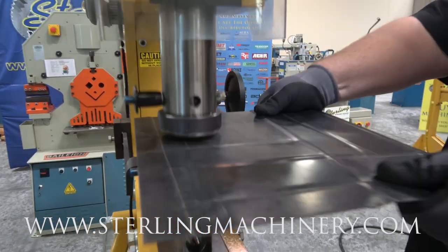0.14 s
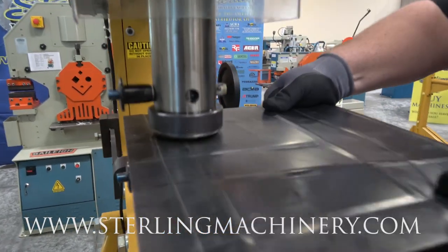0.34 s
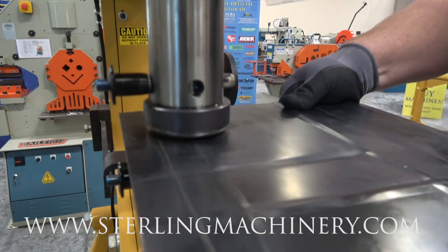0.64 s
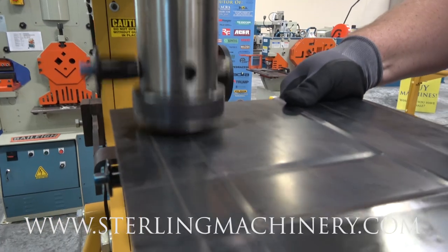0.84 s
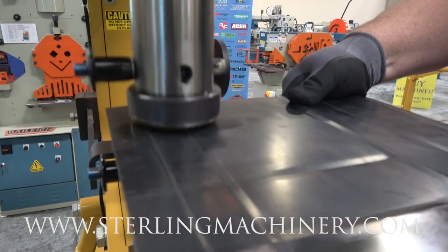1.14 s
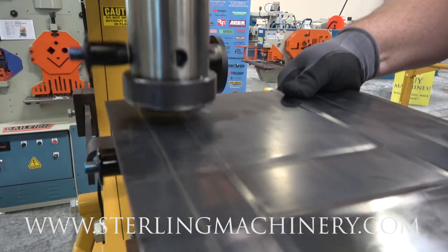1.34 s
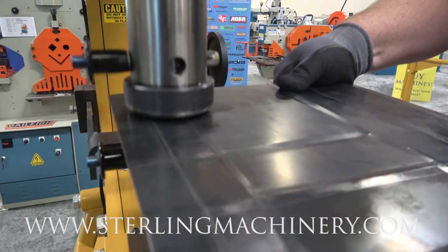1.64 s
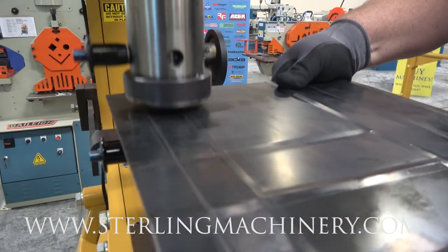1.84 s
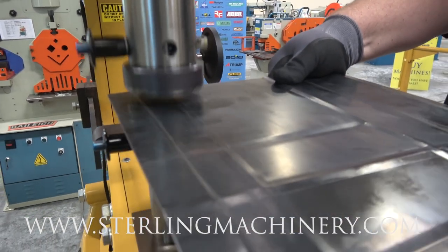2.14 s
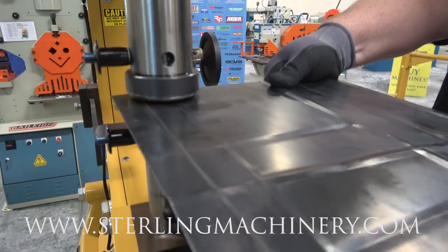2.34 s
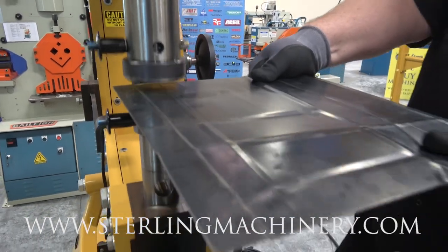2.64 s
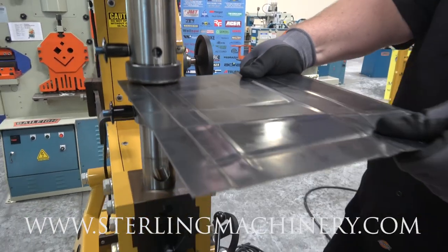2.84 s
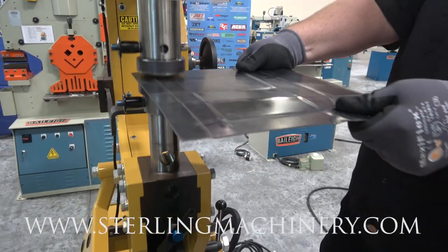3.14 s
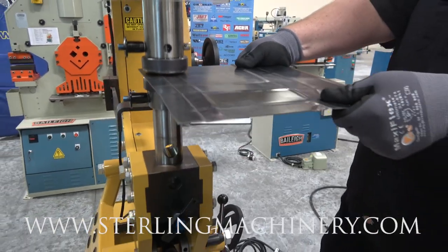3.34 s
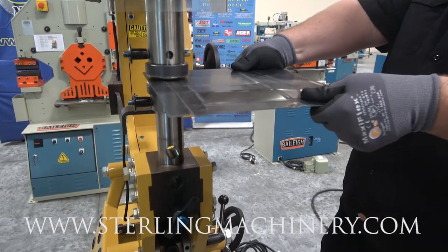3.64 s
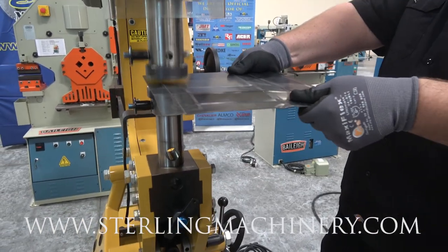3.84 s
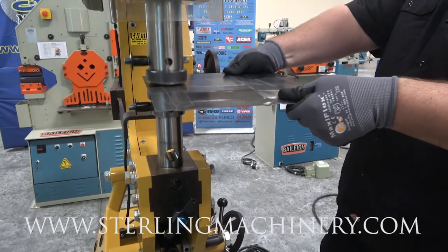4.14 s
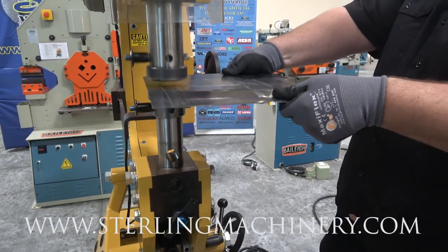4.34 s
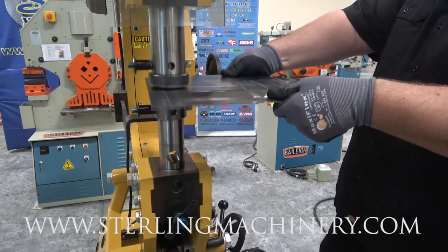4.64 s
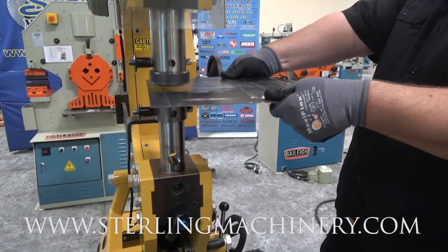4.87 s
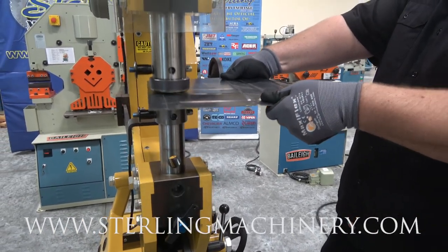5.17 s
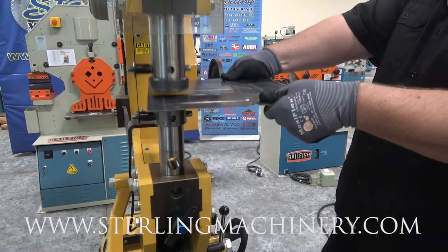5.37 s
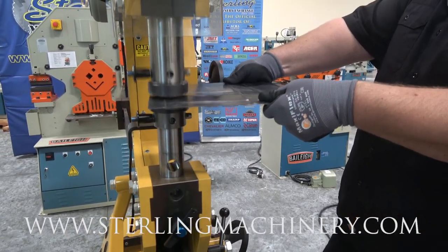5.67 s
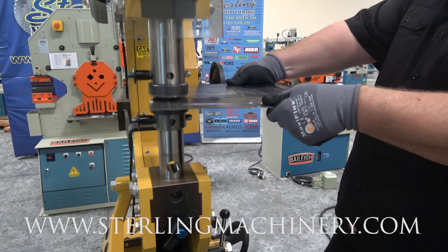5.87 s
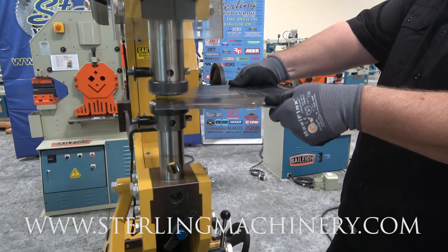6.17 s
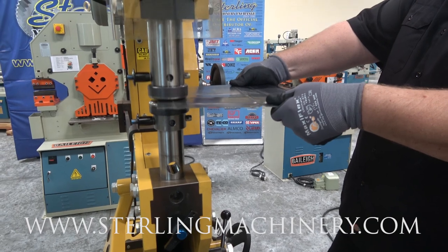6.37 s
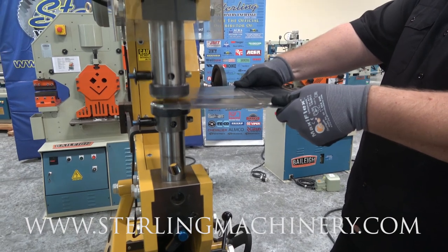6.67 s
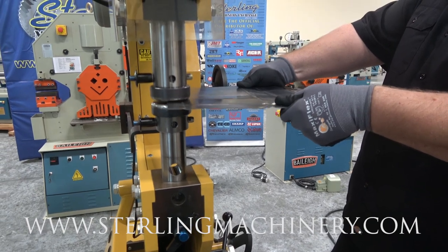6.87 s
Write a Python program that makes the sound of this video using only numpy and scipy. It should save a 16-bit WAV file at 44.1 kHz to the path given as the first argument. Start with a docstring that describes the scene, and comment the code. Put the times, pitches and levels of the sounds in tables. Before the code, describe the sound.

A power hammer pounds hand-held sheet steel at nearly eight sharp, clanking blows a second, with metallic rattles and motor hum in a hard-walled shop.

```python
"""Motor noise fills a hard-walled shop, where a running power hammer beats a hand-held steel sheet.
Each blow cracks the dies, clanks the sheet, thuds in the frame and pushes out air; echoes and rattles follow.
The camera, close at first, is bumped near 0.5 s and 2.2 s while it drifts away and lower.
Near 5 s the sheet trembles longer after its blows. Clicks strike resonances; shaped noise makes the rough parts."""
import sys
import numpy as np
from scipy import signal
from scipy.fft import rfft, irfft
from scipy.io import wavfile

SR = 44100
rng = np.random.default_rng(int(sys.argv[2]) if len(sys.argv) > 2 else 0)


def transcribe(signal):
    """Save signal, clipped to [-1, 1], as a 16-bit WAV file at the path in sys.argv[1]."""
    frames = np.atleast_2d(signal).T
    limited = np.clip(frames, -1, 1)
    pcm = np.round(limited * 32767).astype(np.int16)
    wavfile.write(sys.argv[1], SR, pcm)


def level_to_linear(level):
    """Convert decibel levels to linear amplitude factors, elementwise."""
    exponent = np.asarray(level, float) / 20
    return 10 ** exponent


N = 309141
TIME_S = np.arange(N) / SR

# how the sheet is gripped:
# (time [s], tilt of the clank [dB per octave], relative level of the sheet's own modes [dB])
GRIP_CURVE = [(0, -8, -2.5), (1, 3, 0), (2.4, 0, 1), (3.5, 1, 0), (4.6, -1, 1), (4.85, -1, -4.5),
              (5.7, -1.5, -3.5), (6.1, -1, -1.5), (7, -4, 0.5)]


def band(x, hz, width_hz):
    """Two-pole resonance, gain 1 at the centre."""
    return signal.lfilter(*signal.iirpeak(hz, hz / width_hz, SR), x)


def ring(x, hz, t60):
    """A mode struck by x: a sine that loses 60 dB in t60 seconds."""
    pole = np.exp(2j * np.pi * hz / SR - np.log(1000) / (t60 * SR))
    return signal.lfilter([1], [1, -pole], x).imag


def clicks(s, db):
    """Single-sample clicks at the given times and levels."""
    samples = (np.asarray(s) * SR).astype(int)
    return np.bincount(samples, level_to_linear(np.asarray(db)), 2 * N)[:N]


def fade(x, rise_s, t60):
    """Smooths each click into an envelope with a rise and a decay."""
    fall = np.exp(-np.log(1000) / (t60 * SR))
    rise = np.exp(-1 / (rise_s * SR))
    falling = signal.lfilter([1], [1, -fall], x)
    return signal.lfilter([1 - rise], [1, -rise], falling)


def coloured(spectrum):
    """Noise of rms 1, its spectrum shaped by points of (Hz, dB)."""
    hz, db = np.transpose(spectrum)
    log_hz = np.log(np.arange(1, N // 2 + 2) * SR / N)
    gain = level_to_linear(np.interp(log_hz, np.log(hz), db))
    x = irfft(rfft(rng.standard_normal(N)) * gain, N)
    return x / x.std()


def along(table, s):
    """The columns of a curve, read at times s."""
    at, *cols = np.transpose(table)
    return [np.interp(s, at, col) for col in cols]


def motor_noise():
    """The motor and the shop make a steady noise with a fixed spectrum."""
    # motor and shop noise: (frequency [Hz], relative density [dB per Hz])
    spectrum = [(20, -27), (40, -8), (110, -39), (180, -3), (250, -3.5), (320, 9), (450, -10.5), (700, -15),
                (2000, -33), (5000, -41), (9000, -46), (16000, -42)]
    return level_to_linear(-45.5) * coloured(spectrum)


def chatter(blow_s, blow_db, slaps):
    """Every contact is a sharp knock, then a few ms of rough chatter and a weaker shimmer."""
    upstroke_s, upstroke_db = 0.09, -37.5  # after the blow, relative to it
    blows = clicks(blow_s, blow_db)
    rough = fade(blows, 0.0001, 0.022) + level_to_linear(-13.5) * fade(blows, 0.0016, 0.094)
    rough = rough + fade(slaps, 0.00042, 0.016) + level_to_linear(-16.5) * fade(slaps, 0.00017, 0.024)
    # the linkage clicks as the ram turns at the top
    upstroke = clicks(blow_s + upstroke_s, blow_db + upstroke_db)
    rough = rough + fade(upstroke, 0.0022, 0.092)
    return rough * rng.standard_normal(N) + level_to_linear(13) * blows + slaps


def dies(blow_s, crack_db, clank_db, slaps):
    """The small dies ring high (crack), the clamped sheet lower (clank); both are struck by each contact."""
    # modes of dies and sheet: (frequency [Hz], width [Hz], relative level [dB])
    steel = [(3053, 280, -14.5), (3420, 260, -13.5), (3697, 190, -12), (4220, 1100, -23), (4810, 360, -11),
             (5004, 810, -16.5), (6327, 436, -8), (6900, 110, -5.5), (7352, 354, -2), (7673, 480, -0.5),
             (8680, 750, -1), (9104, 380, -0.5), (9600, 290, -2), (10200, 880, -6), (11096, 590, -12),
             (12040, 510, -12.5), (13500, 3000, -20.5), (14350, 730, -39)]
    die_low_hz, clank_mid_hz = 5600, 3700
    grip_scatter_db = 3  # per octave, random from blow to blow
    crack = chatter(blow_s, crack_db, level_to_linear(3.5) * slaps)
    clank = chatter(blow_s, clank_db, level_to_linear(5) * slaps)
    # the dies have no modes below their first one
    high_pass = signal.butter(4, die_low_hz, "high", fs=SR, output="sos")
    crack = signal.sosfilt(high_pass, crack)
    # where the sheet is gripped tips the clank towards its low or its high modes
    tilt_db = along(GRIP_CURVE, blow_s)[0] + grip_scatter_db * rng.standard_normal(len(blow_s))
    # each tilt holds until the next blow
    latest_blow = np.clip(np.searchsorted(blow_s, TIME_S) - 1, 0, None)
    tilt_db = tilt_db[latest_blow]
    out = 0
    for k, (hz, width_hz, db) in enumerate(steel):
        if hz > die_low_hz:
            force = crack
        else:
            force = clank * level_to_linear(tilt_db * np.log2(hz / clank_mid_hz))
        # neighbouring modes have opposite signs
        out = out + (-1) ** k * level_to_linear(db) * band(force, hz, width_hz)
    return level_to_linear(4) * out


def frame(blow_s, thud_db):
    """Each blow pushes the frame briefly and echoes return the push; the noisy clang has no such echoes."""
    # floor and wall echoes of the thud: (delay [s], relative level [dB])
    echo_table = [(.0125, -1), (.0203, -9), (.0247, 2), (.0287, -6), (.042, -8), (.051, -11), (.079, -12)]
    # broad colour of a blow's clang: (frequency [Hz], relative density [dB per Hz])
    clang_spectrum = [(200, -33), (280, -15), (480, -11), (800, -8), (1300, -3.5), (1900, -2.5),
                      (3000, -7.5), (4500, -12.5), (6500, -17.5), (9000, -26.5)]
    turn_s, turn_db, turn_hz, turn_t60_s = 0.101, -6, 952, 0.04
    hits = clicks(blow_s + 0.00094, thud_db)
    echoes = sum(clicks(blow_s + 0.001005 + s, thud_db + db) for s, db in echo_table)
    push = band(band(level_to_linear(-0.5) * hits + echoes, 673, 680), 673, 680)
    clang_envelope = fade(hits, 0.0018, 0.12) + level_to_linear(-15.0) * fade(hits, 0.0054, 0.56)
    clang = clang_envelope * coloured(clang_spectrum)
    # the crank knocks softly as it turns over
    turn = ring(clicks(blow_s + turn_s, thud_db + turn_db), turn_hz, turn_t60_s)
    turn = fade(turn, 0.0005, 0.00044)
    return level_to_linear(33) * push + turn + level_to_linear(0.5) * clang


def frame_modes(blow_s, thud_db, bright_db):
    """The push spreads through the heavy frame, so each mode swells before it fades."""
    # modes of frame and sheet: (frequency [Hz], relative level [dB], t60 [s], build-up time [s])
    modes = [(291.1, -3.5, 0.29, 0.0053), (361.6, 0, 0.27, 0.02), (415, -8.5, 0.31, 0.012),
             (535, -3.5, 0.14, 0.0048), (591.5, 4.5, 0.15, 0.0082), (664.5, -4, 0.28, 0.016),
             (747.6, -15, 0.58, 0.025), (908.6, -10, 0.21, 0.0051), (1155, 3, 0.11, 0.007),
             (1333, 2.5, 0.14, 0.03), (1552, -18, 0.36, 0.0027), (1732, 0, 0.053, 0.0012),
             (1929, 4, 0.074, 0.0027), (2290, -6.5, 0.14, 0.0047), (2560, -27, 0.048, 0.0076)]
    sheet_modes = (4, 8, 12)  # rows that belong to the sheet
    scatter_db, scatter_rad, mid_hz = 1.8, 0.5, 800
    out = 0
    # level and phase of every mode vary a little from blow to blow
    chance = rng.standard_normal((len(blow_s), 2, len(modes)))
    for k, (hz, db, t60, build_s) in enumerate(modes):
        share_db = thud_db + db + bright_db * np.log2(hz / mid_hz)
        share_db = share_db + scatter_db * chance[:, 0, k]
        if k in sheet_modes:
            share_db = share_db + along(GRIP_CURVE, blow_s)[1]
        hits = clicks(blow_s + 0.000992, share_db) + 0j
        hits[hits != 0] *= np.exp(1j * scatter_rad * chance[:, 1, k])
        # taking away a faster-dying copy makes the mode swell
        swell = ring(hits, hz, t60) - ring(hits, hz, build_s * np.log(1000))
        out = out + (-1) ** k * swell
    return level_to_linear(-2.5) * out


def air(blow_s, push_db):
    """The slapped sheet sends a pressure step, sharp up, then slowly below zero; the floor shakes later."""
    # floor shake felt at the camera: (time [s], relative level [dB])
    shake_curve = [(0, -36), (.6, -39.5), (2, -37.5), (2.6, -46), (3.3, -50), (4.2, -64), (4.7, -54),
                   (7, -61)]
    shake_db = along(shake_curve, blow_s)[0]
    hits = clicks(blow_s + 0.00099, push_db)
    step = fade(hits, 0.00015, 0.0029) - level_to_linear(0.5) * fade(hits, 0.00089, 0.0068)
    shake = ring(clicks(blow_s + 0.022, shake_db), 29.0, 0.18)
    shake = fade(shake, 0.0057, 0.012)
    return level_to_linear(19.0) * step + level_to_linear(-28) * shake


def flap(blow_s):
    """The free part of the sheet wobbles after each blow: low narrow noise that dies away."""
    # low flapping, loud while the camera is above the sheet: (time [s], relative level [dB])
    flap_curve = [(0, -40), (1, -38.5), (2.6, -42.5), (3.2, -48.5), (4.5, -50.5), (7, -52)]
    centre_hz, width_hz, t60_s = 160.4, 136, 0.28
    noise = band(band(rng.standard_normal(N), centre_hz, width_hz), centre_hz, width_hz)
    hits = clicks(blow_s, along(flap_curve, blow_s)[0])
    return fade(hits, 0.0029, t60_s) * noise / noise.std()


def sheet_slaps(blow_s, rebound_db, count):
    """The loose sheet touches the dies again: a random buzz, a rebound, loud slaps and uneven trembles."""
    # loud extra slaps of the loose sheet on a die: (time [s], relative level [dB])
    rattles = [(0.0374, -7), (.0674, -16), (.172, -10), (.4433, -15), (0.5542, -8), (.5697, -13),
               (.979, -15), (1.208, -13), (1.2407, -12), (1.469, -14), (1.6006, -12), (1.735, -14),
               (1.7454, -28), (1.86, -9), (2.157, -17), (2.383, -8), (2.519, -11), (2.7766, -16),
               (3.036, -13), (3.4308, -10), (3.818, -9), (3.949, -21), (4.215, -17), (4.344, -14),
               (4.469, -16), (4.643, -22), (4.738, -10), (4.779, -28), (4.7957, -30), (4.859, -12),
               (4.865, -8.5), (4.8726, -12), (4.907, -38), (4.923, -21), (4.994, -4), (5.002, -13),
               (5.038, -19), (5.0545, -17), (5.121, -10), (5.128, -15), (5.1397, -11), (5.153, -14.5),
               (5.1697, -14), (5.257, -11), (5.389, -7), (5.4352, -30), (5.523, -12), (5.5512, -18),
               (5.653, -14), (5.6806, -12), (5.688, -17), (5.915, -9), (6.0462, -13), (6.178, -19),
               (6.2985, -15), (6.3452, -14), (6.443, -15), (6.4743, -18), (6.48, -11), (6.573, -16),
               (6.6044, -28), (6.702, -21), (6.728, -21), (6.8228, -9.5)]
    # trembling after the rebound, longer where the sheet is held loosely:
    # (time [s], relative level of the first tremble [dB], dying [dB per s])
    tremble_curve = [(0, -41, 700), (2, -27, 700), (3.399, -30, 700), (4.4, -30, 600), (4.701, -21, 330),
                     (4.95, -17.5, 352), (5.2, -27, 700), (5.8, -26.5, 600), (7, -39, 600)]
    # small random contacts while the sheet is loose: (time [s], relative level [dB])
    buzz_curve = [(0, -24.5), (2, -26), (3.5, -30), (4.5, -27), (5, -22.5), (5.8, -23), (7, -24)]
    rebound_s = 0.0358  # the sheet jumps off the die and lands again this long after a blow
    tremble_gap_s, scatter_db = 0.011, 5
    buzz_from_s, buzz_to_s = 0.008, 0.058  # window after the blow
    starts_s = blow_s[:, None]
    shape = (len(blow_s), count)

    first_db, dying = along(tremble_curve, starts_s)
    late_s = tremble_gap_s * np.cumsum(0.5 + rng.random(shape), axis=1)
    tremble_s = starts_s + rebound_s + late_s
    tremble_db = first_db - dying * (late_s - tremble_gap_s)
    tremble_db = tremble_db + scatter_db * rng.standard_normal(shape)
    trembles = clicks(tremble_s.ravel(), tremble_db.ravel())

    buzz_s = starts_s + buzz_from_s + (buzz_to_s - buzz_from_s) * rng.random(shape)
    buzz_db = along(buzz_curve, buzz_s)[0] + scatter_db * rng.standard_normal(shape)
    buzz = clicks(buzz_s.ravel(), buzz_db.ravel())

    rebounds = clicks(blow_s + rebound_s, rebound_db)
    return buzz + rebounds + clicks(*np.transpose(rattles)) + trembles


def shop(x):
    """The hard walls return dense reflections: bands of noise, each with its own decay."""
    # shop reverberation: (frequency [Hz], t60 [s], relative level [dB])
    reflections = [(296, 0.92, -19), (700, 0.25, -19.5), (1030, 0.9, -32.5), (2430, 0.26, -33),
                   (4750, 0.22, -44), (9000, 0.12, -48)]
    t = TIME_S[:SR]
    tail = 0
    for hz, t60, db in reflections:
        noise = band(rng.standard_normal(SR), hz, 0.3 * hz)
        tail = tail + level_to_linear(db) * noise * 1000 ** (-t / t60)
    build_up = np.clip(t / 0.036, 0, 1)
    return signal.fftconvolve(x, tail * build_up)[:N]


def bumps():
    """A knock on the camera body swings the microphone up, deep down and up again, each swing slower."""
    # camera bumps: (time [s], relative level [dB], time scale of the swings [s], fading time [s])
    knocks = [(.474, 3.5, .0087, .0083), (2.2378, -10, .0048, .0032), (2.2511, -2.5, .0112, .0096),
              (2.2605, -3, .0085, .0098), (2.2623, 0, .0008, .0013)]
    out = 0
    for s, db, swing_s, fading_s in knocks:
        t = np.clip(TIME_S - s, 0, 1)
        envelope = t / fading_s * np.exp(-t / fading_s)
        # the logarithm stretches each swing more than the one before
        swing = np.sin(2 * np.pi * 0.87 * np.log1p(t / swing_s))
        out = out + level_to_linear(db) * envelope * swing
    return out


def scene():
    """Adds motor noise, the hammer with its reverberation, air, flapping sheet and camera bumps."""
    # hammer blows, all levels relative:
    # (time [s], crack [dB], clank [dB], rebound slap [dB], air push [dB])
    blow_table = [(0.0247, 3.5, 5.5, -11, -29), (0.155, 3, 6.5, -10, -26), (0.2851, 4.5, -1.5, -8, -22),
                  (0.416, 4.5, -2, -11, -26.5), (0.5462, 2, 3, -11, -29), (0.6767, 3, 2, -11, -30),
                  (0.8076, 2.5, 3.5, -6, -32), (0.9383, 3.5, 4.5, -5, -29.5), (1.0688, 3, 4, -6.5, -27.5),
                  (1.1983, 2, .6, -11, -34), (1.3292, 3.5, 5, -6, -28), (1.46, 2.5, 2, -6, -29.5),
                  (1.5909, 1.5, 4, -12, -34), (1.7216, 2, 4.5, -12, -34), (1.8517, 2, 4, -12, -32.5),
                  (1.982, 0.5, 6, -6, -28.5), (2.112, 1, -3, -11, -27), (2.243, 1, 0.5, -13, -31),
                  (2.3746, 0.5, -2, -15, -38.5), (2.505, -1.5, -26, -11, -39), (2.635, -1.5, 0, -10, -35.5),
                  (2.7662, -0.5, 2, -11, -43), (2.8968, .6, 4, -14, -42), (3.0275, 1, 0.5, -5.5, -30.5),
                  (3.158, 3, -2, -4, -23.5), (3.2883, 2, 3.5, -10.5, -27.5), (3.4191, 2, 4.5, -9, -22),
                  (3.5502, 1.2, 7, -13, -31), (3.68, 2, 4, -11, -28.5), (3.811, 0, 5, -13, -45.5),
                  (3.9421, -0.5, 6.5, -22, -39), (4.072, 0, 7.5, -15, -41), (4.2032, 0, 5.5, -19.5, -51),
                  (4.3337, -2.5, 8, -19, -51), (4.464, -0.2, 7, -17, -32), (4.595, -1.5, 1, -16, -39),
                  (4.7244, 0, -1, -11, -38.5), (4.8544, -3, 3, -21, -64), (4.9849, -4, 2.5, -12.5, -40),
                  (5.1142, -6.5, -2, -14, -55), (5.2437, -4, 3, -13, -48), (5.3754, -4.5, 2.5, -11.5, -48),
                  (5.506, -4.5, -0.5, -9, -48), (5.6374, -3, 0, -13, -45), (5.768, 0, 1.5, -16, -37),
                  (5.8991, -1.5, -2, -11, -44), (6.0297, -0.5, -1, -12, -51), (6.1607, -1.5, 0.5, -14, -37),
                  (6.2918, -2.5, 3.5, -11.5, -45), (6.422, -0.7, 0.5, -12.5, -38),
                  (6.5528, -2, 2, -15, -39), (6.6831, -0.5, 1, -17, -37), (6.814, -1.5, -1, -24, -38),
                  (6.9441, 0, 3, -16, -35)]
    # the frame's thud at the camera:
    # (time [s], relative level [dB], brightness of its modes [dB per octave])
    thud_curve = [(0, -17.5, 0.9), (.9, -19.5, 0.5), (1.3, -21.5, -1), (1.9, -21.5, 1), (2.3, -27.5, -0.5),
                  (2.55, -21.5, 0), (3.3, -23.5, 1), (4.05, -24.5, 1.5), (4.6, -25.5, 2), (4.85, -26, 1),
                  (5.1, -29.5, 3.5), (5.6, -31, 2.5), (6.0, -27, 2), (6.3, -26, 0.8), (7, -24.5, -0.5)]
    blow_s, crack_db, clank_db, rebound_db, push_db = np.transpose(blow_table)
    thud_db, bright_db = along(thud_curve, blow_s)

    slaps = sheet_slaps(blow_s, rebound_db, count=7)
    hammer = dies(blow_s, crack_db, clank_db, slaps) + frame(blow_s, thud_db)
    hammer = hammer + level_to_linear(-8.0) * shop(hammer) + frame_modes(blow_s, thud_db, bright_db)
    # the hammer is already running: before the first blow rings the same tail as before the third
    first, third = (blow_s[[0, 2]] * SR).astype(int)
    hammer[:first] = hammer[third - first:third]
    # the machine is too small to radiate deep bass
    high_pass = signal.butter(5, 262, "high", fs=SR, output="sos")
    hammer = signal.sosfilt(high_pass, hammer)

    low = air(blow_s, push_db) + flap(blow_s) + bumps()
    return (hammer + low + motor_noise())[None]


def band_limit(x):
    """A steep low-pass at the top of the band."""
    return signal.sosfilt(signal.butter(12, 16480, fs=SR, output="sos"), x)


def record(dry):
    """The camera cuts the deepest bass, clips whatever exceeds full scale and drops the top."""
    bass_cut = signal.butter(1, 15, "high", fs=SR, output="sos")
    clipped = np.clip(signal.sosfilt(bass_cut, dry), -1, 1)
    top_cut = signal.ellip(6, 0.2, 50, 15600, fs=SR, output="sos")
    mix = signal.sosfilt(top_cut, clipped)
    return band_limit(mix)


dry = scene()
out = record(dry)
transcribe(out)
```